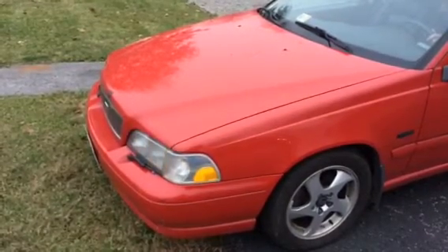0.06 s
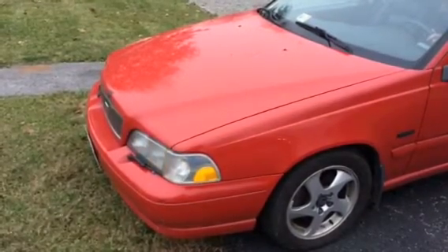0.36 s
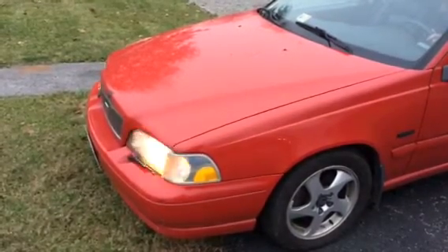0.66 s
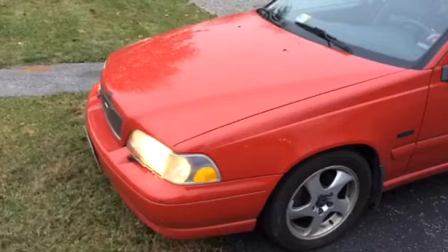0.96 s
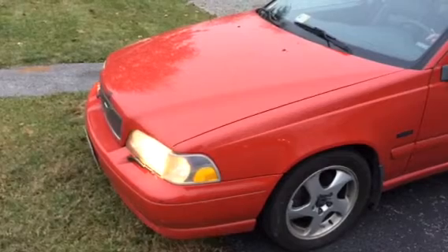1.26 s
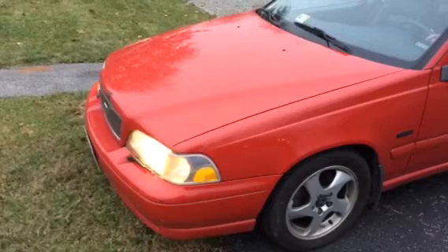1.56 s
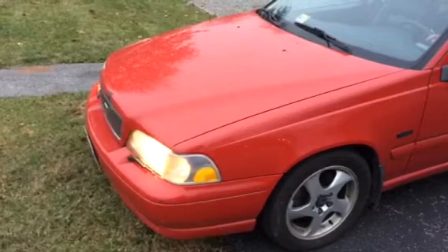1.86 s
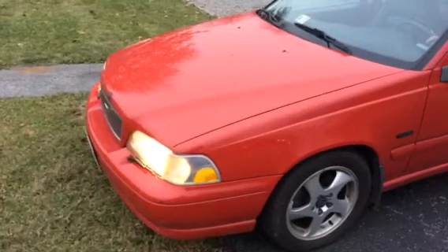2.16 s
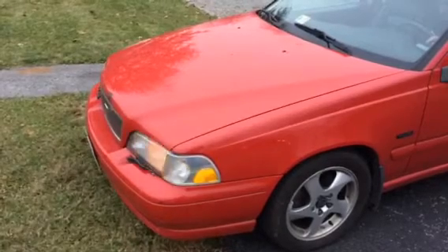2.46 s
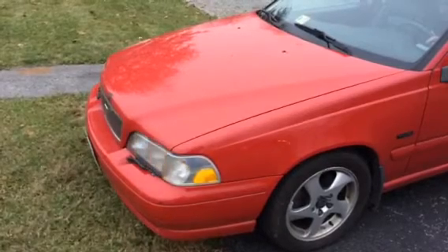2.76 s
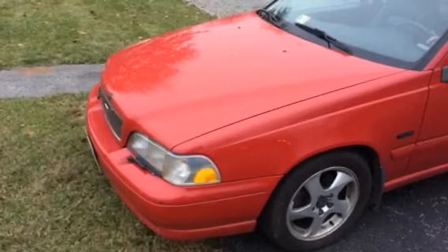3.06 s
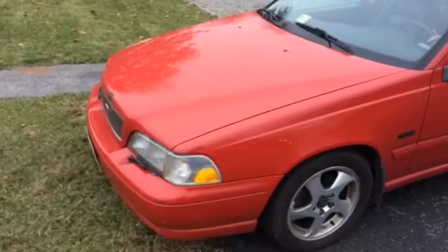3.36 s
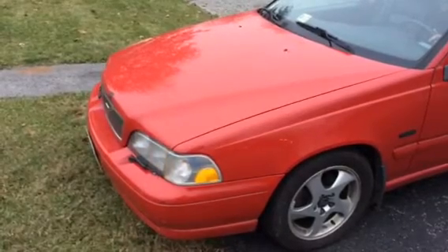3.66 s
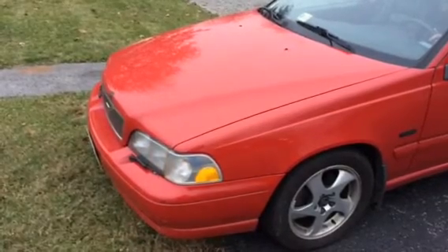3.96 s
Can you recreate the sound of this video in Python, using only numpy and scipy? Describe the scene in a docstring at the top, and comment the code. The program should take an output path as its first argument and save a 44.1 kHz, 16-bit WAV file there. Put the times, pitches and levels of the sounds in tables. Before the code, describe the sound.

A car starter cranks, winds down, then cranks again, but the engine never starts.

```python
"""A car's starter cranks an engine that will not fire, heard outdoors beside the front wheel.
The gears grind and rasp in surges, one per compression; the drive clatters across its backlash.
The key is let go: the engine rocks to rest and the armature coasts down, whistling.
The solenoid clacks in again, the motor whines up and cranks on, over a low rumble and quiet air."""
import sys
import numpy as np
from scipy import signal
from scipy.fft import rfft, irfft
from scipy.io import wavfile
from scipy.ndimage import uniform_filter1d

SR = 44100
rng = np.random.default_rng(int(sys.argv[2]) if len(sys.argv) > 2 else 0)


def put_to_file(sound):
    """Save the sound as 16-bit audio at rate SR, in the file named by the first command-line argument."""
    columns = np.atleast_2d(sound).T  # one column per channel
    safe = np.clip(columns, -1, 1)
    whole_steps = np.round(safe * 32767)
    wavfile.write(sys.argv[1], SR, whole_steps.astype(np.int16))


N = 176400
TIME = np.arange(N) / SR

ENGAGED_S = (-.1, 0.63), (2.39, 4.1)  # from, to
TEETH_PER_S, GRIND_RUB, RASP_RUB = 1600, 0.63, 0.48
# steady grind: t/s, level/dB
GRIND_LEVEL = [(0, -38.5), (.18, -37.5), (.35, -42), (.51, -39), (.63, -40), (2.39, -54.5), (2.5, -48.5),
               (2.62, -48.5), (2.73, -46), (2.79, -46.5), (2.95, -45.5), (3.05, -47.5), (3.09, -48),
               (3.22, -41), (3.6, -41), (4, -40)]
# rasp surges: t/s, rise/s, hold/s, level/dB
SURGES = [(0.051, 0.015, 0.036, -33), (0.254, 0.021, 0.0074, -30), (0.361, 0.023, 0.034, -32),
          (0.562, 0.015, 0.0081, -30), (0.629, .008, 0.011, -38.5), (2.802, 0.027, .035, -40),
          (3.096, 0.028, 0.038, -33), (3.339, 0.018, 0.037, -34), (3.482, 0.017, 0.031, -33.5),
          (3.69, 0.017, 0.017, -31.5), (3.801, 0.022, 0.021, -32), (3.954, 0.011, .035, -38.5)]
# spectra: f/Hz, level/dB
GRIND_SPECTRUM = [(150, 5.5), (500, -0.5), (750, -4.5), (1100, -1.5), (2600, -5), (4000, -1.5),
                  (7000, -2.5), (8500, -5), (10500, -12.5), (13000, -16.5), (15400, -18)]
RASP_SPECTRUM = [(300, -72), (1500, -2), (2600, -6), (3600, 0.5), (5500, -0.5), (7500, 0), (8600, -2),
                 (10500, -8.5), (13000, -9.5), (15400, -28)]
# starter housing modes: f/Hz, width/Hz, lift/dB
HOUSING_MODES = [(3490, 50, 4.1), (3930, 370, 2.6), (4514, 96, 6.1), (4743, 80, 7.3), (5414, 175, 8.1),
                 (6295, 130, 7.6), (6560, 43, 3.6), (7020, 340, 6.75), (8920, 85, 2.8), (12000, 300, 3.6)]

def gears():
    """The pinion grinds on the ring gear while engaged and rasps at each compression."""
    engaged = sum(burst(on, 0.028, off - on, 0.079) for on, off in ENGAGED_S)
    grind_db, = curve(GRIND_LEVEL)
    grind_gain = amp(grind_db + 1.63 * wander(30))
    grind = colour(contacts(TEETH_PER_S, GRIND_RUB), GRIND_SPECTRUM, HOUSING_MODES)
    surge_power = sum((amp(db) * burst(t, rise, hold, t60_s=0.16)) ** 2 for t, rise, hold, db in SURGES)
    rasp = colour(contacts(TEETH_PER_S, RASP_RUB), RASP_SPECTRUM, HOUSING_MODES)
    return engaged * (grind_gain * grind + np.sqrt(surge_power) * rasp)


RATTLES_PER_S, CLATTER_RUB = 450, 0.37
# drive backlash: t/s, hold/s, clatter/dB, thump/dB, edge/dB
BACKLASH_KNOCKS = [(.005, 0.013, -45.5, -46.5, -56), (.055, 0.026, -44.5, -48, -52),
                   (.127, 0.012, -39, -42.5, -52), (.209, 0.044, -36, -43, -39),
                   (.33, 0.014, -42.5, -43, -43), (.375, 0.021, -39.5, -40.5, -51),
                   (.445, 0.02, -40, -40, -47), (.523, 0.042, -38.5, -39.5, -35.5),
                   (.638, 0.028, -39, -36.5, -64), (.682, 0.038, -43.5, -40, -56),
                   (.748, 0.018, -37.5, -43.5, -48.5), (.787, 0.035, -54, -46, -74),
                   (.857, 0.017, -42, -39.5, -58), (.939, 0.027, -45.5, -46.5, -61),
                   (1.005, 0.018, -47.5, -42, -59), (1.055, 0.02, -41, -49, -53),
                   (1.098, 0.02, -49.5, -45.5, -75), (1.168, 0.016, -47.5, -52, -75),
                   (1.235, 0.028, -56, -50.5, -59), (2.89, .025, -41, -42.5, -42.5),
                   (3.175, 0.01, -44, -43, -48), (3.215, 0.021, -56, -57, -46.5),
                   (3.273, 0.039, -36, -45.5, -39.5), (3.35, 0.011, -51, -48, -59),
                   (3.465, 0.019, -40.5, -40, -38), (3.55, 0.026, -53, -45.5, -62),
                   (3.642, 0.028, -37, -38, -39.5), (3.68, 0.033, -45, -46, -50),
                   (3.812, 0.023, -39, -41, -62), (3.883, 0.021, -38, -41, -61),
                   (3.957, .045, -38, -38.5, -51)]
# relay drops out, solenoid pulls in and slams home: same columns
SOLENOID_KNOCKS = [(2.008, 0.0073, -56.5, -61, -66), (2.335, 0.015, -50.5, -50, -51),
                   (2.35, 0.011, -36, -42, -33), (2.367, 0.0064, -33.5, -36.5, -45)]
# spectra: f/Hz, level/dB
CLATTER_SPECTRUM = [(150, -31), (300, -4), (480, 0), (740, -5.5), (950, 0.5), (1800, -5), (2400, -12.5),
                    (3300, -8.5), (5000, -39.5), (15000, -35)]
THUMP_SPECTRUM = [(50, -46), (100, -11), (165, -8.5), (218, 5), (265, -15), (400, -14), (700, -21),
                  (3000, -64)]
EDGE_SPECTRUM = [(900, -16), (1900, 2), (3200, 5.5), (5500, -2.5), (7500, -5), (10000, -7.5), (15000, -20)]
# engine block modes: f/Hz, width/Hz, lift/dB
BLOCK_MODES = [(605, 88, 9), (898, 16, 7), (963, 31, 3), (1090, 26, -3), (1236, 37, 8), (1320, 83, 3),
               (1452, 107, 8), (1750, 39, 11.5), (1855, 28, 7), (2024, 41, 8), (2146, 25.8, 9),
               (3495, 54, 10.5)]

def knocks(rows):
    """Each blow rattles the block, thumps the body and draws a bright edge from the housing."""
    starts, holds, clatter_db, thump_db, edge_db = np.transpose(rows)

    def envelope(levels_db, t60_s):
        blows = zip(starts, holds, levels_db)
        return np.sqrt(sum((amp(db) * burst(t, 0.0018, hold, t60_s)) ** 2 for t, hold, db in blows))

    clatter = colour(contacts(RATTLES_PER_S, CLATTER_RUB), CLATTER_SPECTRUM, BLOCK_MODES)
    thump = even(colour(rng.standard_normal(N), THUMP_SPECTRUM), window_samples=1500)
    edge = colour(contacts(TEETH_PER_S, CLATTER_RUB), EDGE_SPECTRUM, HOUSING_MODES)
    return (envelope(clatter_db, t60_s=0.096) * clatter
            + envelope(thump_db, t60_s=0.15) * thump
            + envelope(edge_db, t60_s=0.096) * edge)


# gearing fundamental: t/s, f/Hz
WHINE_PITCH = [(2.39, 130), (2.44, 207.6), (2.5, 277.2), (2.56, 313.2), (2.66, 352.4), (2.7, 347),
               (2.75, 319.7), (2.86, 264.6), (2.92, 357.4), (2.97, 385), (3.01, 377.3), (3.08, 313.6),
               (3.12, 287.7)]
# envelope: t/s, level/dB
WHINE_LEVEL = [(2.42, -49), (2.5, -47.5), (2.6, -48), (2.66, -43.5), (2.71, -44.5), (2.755, -40),
               (2.8, -50), (2.88, -54), (2.96, -44.5), (3.045, -41.5), (3.085, -47), (3.12, -62)]
# partials: multiple, level/dB
WHINE_ORDERS = [(2, 1), (3, 0), (4, 0.5), (5, -4), (6, -10), (8, 1.5), (12, -1.5)]
# groan: t/s, roughness/0-1
WHINE_ROUGHNESS = [(2.72, .35), (2.9, .8)]
# spectra: f/Hz, level/dB
WHINE_SPECTRUM = [(500, -18), (950, -6), (1250, 2.5), (1750, 2), (2100, 1.5), (2550, 2), (2900, -4),
                  (4200, -1.5), (5000, -9)]
MESH_SPECTRUM = [(200, -15), (750, -2.5), (1200, -6.5), (1800, 3), (2800, 0), (4500, -2.5), (7000, -5.5),
                 (9000, -26)]

def whine():
    """On the second try the gearing sings up, then sags at two compressions and roughens to a groan."""
    hz, = curve(WHINE_PITCH)
    level_db, = curve(WHINE_LEVEL)
    roughness, = curve(WHINE_ROUGHNESS)
    phase = phase_of(hz * (1 + 0.0108 * wander(67)))
    phase += 0.07 * wander(300)  # tooth scatter, rad
    tone = 0
    for order, db in WHINE_ORDERS:
        flutter_db = 3 * wander(22)
        tone += amp(db + flutter_db) * rough_tone(order * phase + rng.uniform(0, 2 * np.pi), roughness)
    mesh = amp(2) * colour(contacts(TEETH_PER_S, GRIND_RUB), MESH_SPECTRUM)
    on, off = WHINE_PITCH[0][0], WHINE_PITCH[-1][0]
    return burst(on, 0.01, off - on, 0.039) * amp(level_db) * (colour(tone, WHINE_SPECTRUM) + mesh)


# glides: t/s, length/s, from/Hz, to/Hz, level/dB
SQUEAKS = [(0.594, 0.031, 4800, 4700, -36), (1.584, 0.055, 5850, 5400, -61),
           (2.396, 0.065, 2400, 3620, -40.5), (3.023, 0.046, 7250, 6840, -41)]

def squeaks():
    """The starter squeaks in short, unsteady glides that swell and fade."""
    jitter = 1 + 0.012 * wander(203)
    out = 0
    for t, length, from_hz, to_hz, db in SQUEAKS:
        progress = np.clip((TIME - t) / length, 0, 1)
        hz = from_hz + (to_hz - from_hz) * progress
        out += amp(db) * np.sin(np.pi * progress) * rough_tone(phase_of(hz * jitter), roughness=0.52)
    return out


# armature whistle: t/s, f/Hz
COAST_PITCH = [(.66, 6900), (.9, 5450), (1.1, 4350), (1.3, 3330), (1.5, 2330), (1.7, 1520), (2.0, 363)]
# run-down: t/s, whistle/dB, brushes/dB
COAST_LEVELS = [(.66, -74, -49.5), (.85, -67, -52.5), (1.05, -66, -51), (1.2, -71, -56), (1.35, -63, -58.5),
                (1.5, -76, -60.5), (1.62, -73, -62.5), (1.75, -83, -66), (2.0, -79, -75.5)]
# brush hiss: f/Hz, level/dB
BRUSH_SPECTRUM = [(500, 4.5), (1300, -0.5), (3000, 0.5), (5500, -9.5), (9000, -8.5), (15000, -21.5)]

def coasting():
    """The freed armature runs down with a falling whistle and fading brush hiss."""
    hz, = curve(COAST_PITCH)
    whistle_db, brush_db = curve(COAST_LEVELS)
    phase = phase_of(hz * (1 + 0.0053 * wander(118)))
    flutter_db = 4.8 * wander(33)
    octave = amp(-8) * np.sin(2 * phase)
    whistle = amp(whistle_db + flutter_db) * unit(rough_tone(phase, roughness=0.41) + octave)
    brushes = amp(brush_db) * colour(contacts(TEETH_PER_S, GRIND_RUB), BRUSH_SPECTRUM, HOUSING_MODES)
    on, off = COAST_LEVELS[0][0], COAST_LEVELS[-1][0]
    return burst(on, 0.012, off - on, 0.08) * (whistle + brushes)


# engine thuds: t/s, level/dB
THUDS = [(.235, -41), (1.253, -37), (1.325, -34), (3.396, -35), (3.756, -29)]

def engine_rock(hz=81.5, t60_s=0.096):
    """The engine rocks on its mounts with soft, damped thuds."""
    return sum(amp(db) * burst(t, 0.005, 0, t60_s) * np.sin(2 * np.pi * hz * (t - TIME))
               for t, db in THUDS)


# envelope: t/s, level/dB
RUMBLE_LEVEL = [(0, -44), (.4, -48.5), (1.1, -47), (1.3, -46.5), (1.55, -53), (2.1, -52), (2.7, -52.5),
                (3.08, -55), (3.25, -46), (4, -51.5)]
# spectrum: f/Hz, level/dB
RUMBLE_SPECTRUM = [(20, -18.5), (35, -11.5), (55, -6), (76, 4), (95, -2), (125, -3), (165, -7),
                   (210, -12.5), (280, -18.5), (450, -22.5), (900, -49.5)]

def rumble():
    """Low noise that eases between the tries."""
    level_db, = curve(RUMBLE_LEVEL)
    return amp(level_db) * even(colour(rng.standard_normal(N), RUMBLE_SPECTRUM), window_samples=4000)


def pump(hz=4860, level_db=-82, hold_s=2.01):
    """A thin electric tone, likely the fuel pump, stops at the relay click."""
    phase = phase_of(hz * (1 + 0.0022 * wander(40)))
    tone = np.sin(phase) + amp(-5) * np.sin(3 * phase)
    return amp(level_db) * burst(0, 0.01, hold_s, 0.05) * tone


# spectrum: f/Hz, level/dB
AIR_SPECTRUM = [(250, -3), (700, -11), (1200, -8.5), (2500, -18.5), (6000, -25.5), (15000, -42)]

def air(level_db=-71.5):
    """Quiet, steady outdoor noise."""
    return amp(level_db) * colour(rng.standard_normal(N), AIR_SPECTRUM)


def contacts(per_s, rub, spread_db=3.5, bay_t60_s=0.041, bay_db=-4.5):
    """Uneven metal clicks plus smooth friction (power share: rub), scattered by the engine bay."""
    count = np.cumsum(per_s * np.exp(0.3 * wander(60))) / SR
    strength = amp(spread_db * np.clip(rng.standard_normal(N), -2, 2))
    clicks = np.diff(np.floor(count), prepend=0) * strength * rng.choice([-1, 1], N)
    force = np.sqrt(1 - rub) * unit(clicks) + np.sqrt(rub) * rng.standard_normal(N)
    t = TIME[:SR // 10]
    bay_tail = rng.standard_normal(len(t)) * amp(-60 * t / bay_t60_s)
    return unit(force + amp(bay_db) * unit(signal.fftconvolve(force, bay_tail)[:N]))


def rough_tone(phase, roughness):
    """A sine, partly smeared into sidebands by uneven contact."""
    sidebands = wander(70) * np.sin(phase) + wander(70) * np.cos(phase)
    return np.sqrt(1 - roughness) * np.sin(phase) + np.sqrt(roughness / 2) * sidebands


def colour(x, spectrum, modes=()):
    """Filter by a broad spectrum and a chain of resonances; rms 1."""
    f = np.fft.rfftfreq(N, 1 / SR) + 1e-3
    hz, db = np.transpose(spectrum)
    response = amp(np.interp(np.log(f), np.log(hz), db))
    for centre_hz, width_hz, lift_db in modes:
        detuning = (f * f - centre_hz ** 2) / (f * width_hz)
        response = response * (1 + (amp(lift_db) - 1) / (1 + 1j * detuning))
    return unit(irfft(rfft(x) * response, N))


def burst(start_s, rise_s, hold_s, t60_s):
    """Linear rise, hold, exponential decay."""
    age = TIME - start_s
    return np.clip(age / rise_s, 0, 1) * amp(-60 * np.clip((age - rise_s - hold_s) / t60_s, 0, 2))


def wander(corner_hz):
    """Low-passed random drift; rms 1."""
    pole = np.exp(-2 * np.pi * corner_hz / SR)
    return unit(signal.lfilter([1], [1, -2 * pole, pole * pole], rng.standard_normal(N + SR))[SR:])


def even(x, window_samples):
    """Steady the strength of a low vibration."""
    return x / np.sqrt(uniform_filter1d(x * x, window_samples) + 0.21)


def curve(rows):
    """Columns of a time table, linearly interpolated."""
    t, *columns = np.transpose(rows)
    return [np.interp(TIME, t, column) for column in columns]


def phase_of(hz):
    """Running phase in rad."""
    return 2 * np.pi * np.cumsum(hz) / SR


def amp(db):
    """dB to gain."""
    return 10 ** (np.asarray(db) / 20)


def unit(x):
    """Scale to rms 1."""
    return x / np.sqrt(np.mean(x ** 2) + 1e-20)


def scene():
    """The car over quiet outdoor air, mono."""
    outdoors = air()
    starter = gears() + knocks(BACKLASH_KNOCKS + SOLENOID_KNOCKS) + whine() + squeaks() + coasting()
    return (starter + engine_rock() + pump() + rumble() + outdoors)[None]


def record(dry, low_cut_hz=40, high_cut_hz=15400):
    """The small microphone drops the deep bass; the top is cut steeply."""
    highpass = signal.butter(2, low_cut_hz, "high", fs=SR, output="sos")
    lowpass = signal.ellip(12, 0.1, 80, high_cut_hz, fs=SR, output="sos")
    return signal.sosfilt(lowpass, signal.sosfilt(highpass, dry))


dry = scene()
out = record(dry)
put_to_file(out)
```